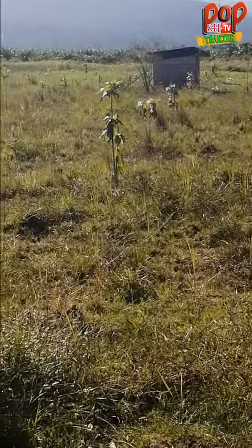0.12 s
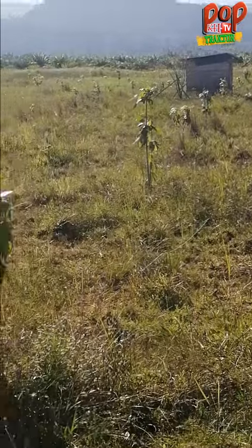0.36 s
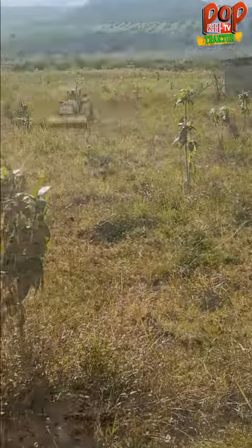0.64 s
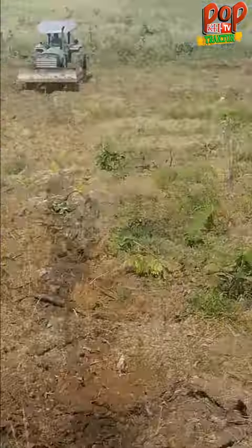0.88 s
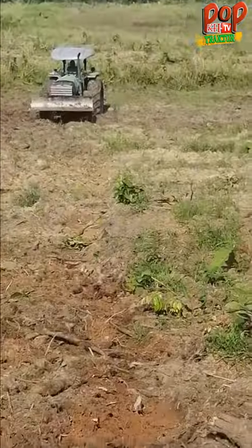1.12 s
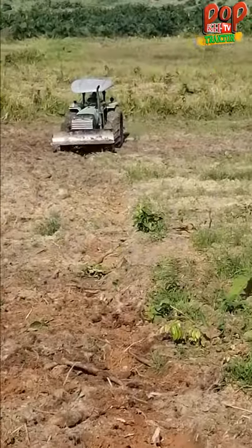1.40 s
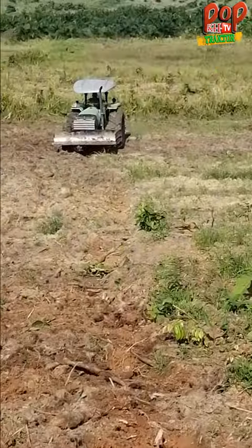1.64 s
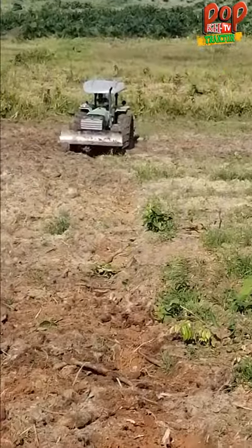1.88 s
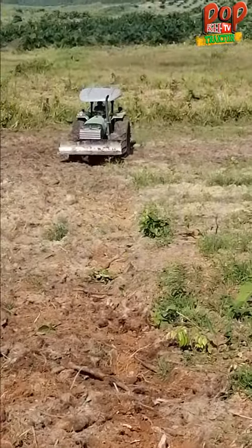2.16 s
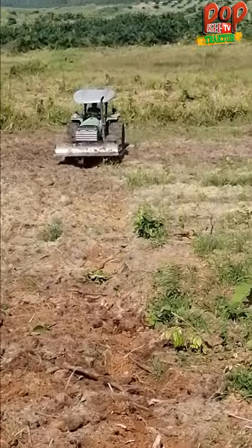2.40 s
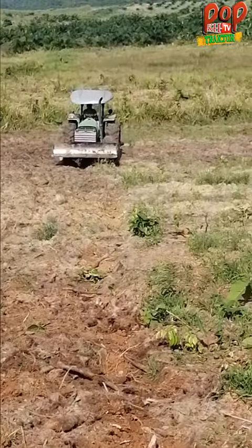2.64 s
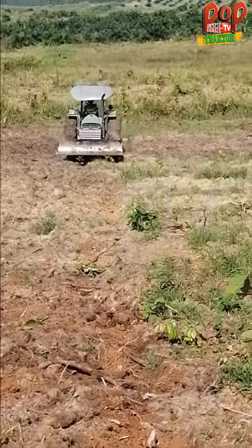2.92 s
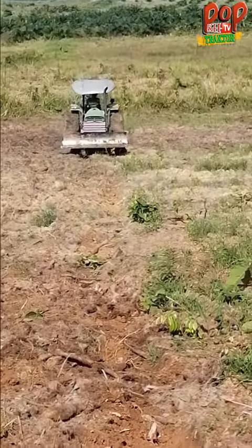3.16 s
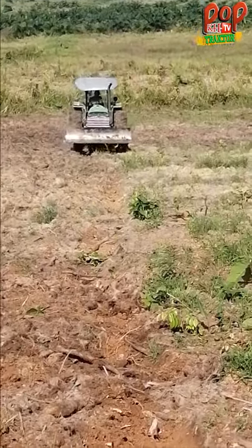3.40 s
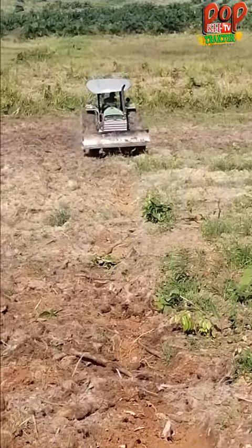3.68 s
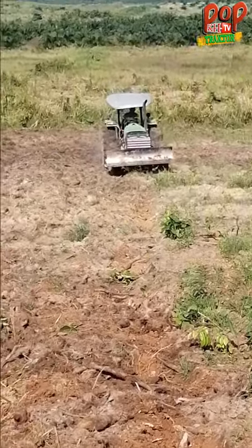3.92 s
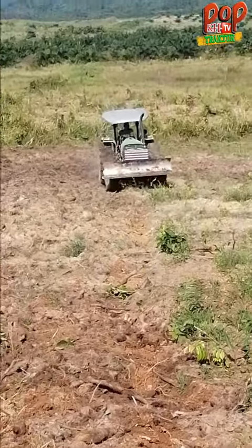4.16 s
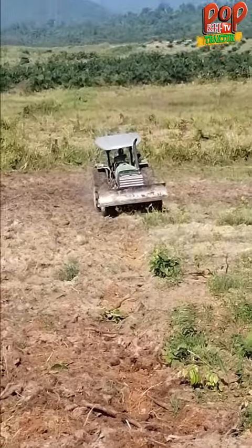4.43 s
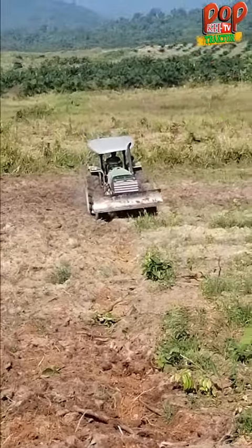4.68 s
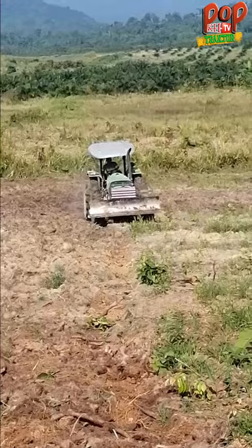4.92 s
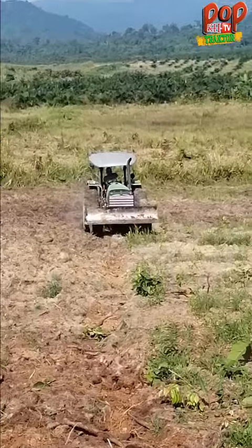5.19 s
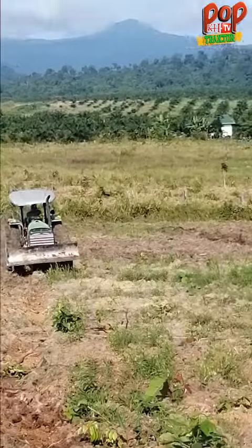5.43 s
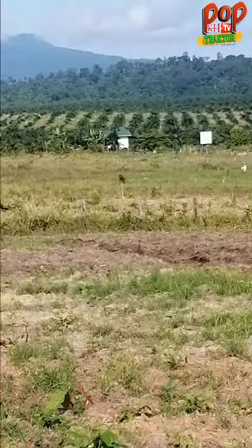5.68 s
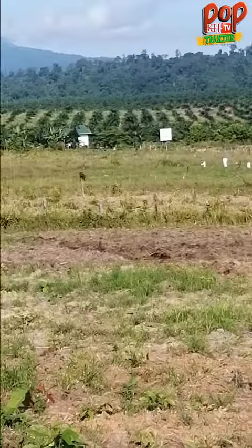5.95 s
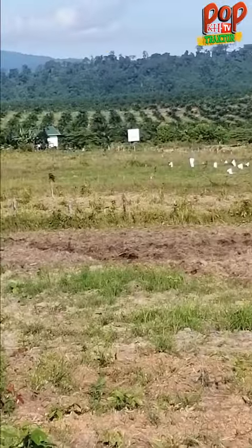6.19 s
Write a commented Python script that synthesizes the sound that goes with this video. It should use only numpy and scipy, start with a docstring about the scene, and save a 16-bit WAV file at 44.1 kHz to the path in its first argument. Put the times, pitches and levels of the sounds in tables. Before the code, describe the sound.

A still, open field opens with soft low wind on the microphone, faint dry grass crackle and a few tiny stalk snaps. Just before one second it cuts hard to a labouring diesel tractor: low drone, fast clattering knock and metallic clanks. The engine pitch wavers up and down, briefly sinking as the fuel eases and biting back, with rumble slowly growing. Stereo outdoor handheld pickup, dry, no echo.

```python
"""Wind buffets two microphone ports, dry grass crackles underfoot and an engine swells far off; then a hard
cut to a four-cylinder diesel tractor labouring across a field. Wind, grass and far engine are coloured noise.
The tractor is exhaust harmonics plus knock noise gated by each firing and rung through block and bonnet
resonances; its speed follows a table, and scheduled governor fuel cuts sink knock and exhaust.
The two ports differ in colour."""
import sys
import numpy as np
from scipy import signal
from scipy.fft import rfft, irfft, next_fast_len
from scipy.io import wavfile
from scipy.ndimage import uniform_filter1d, map_coordinates

SR = 44100
rng = np.random.default_rng(int(sys.argv[2]) if len(sys.argv) > 2 else 0)


def bounce(signal):
    """Save signal as a 16-bit WAV file at the path given by the first command-line argument."""
    frames = np.transpose(np.atleast_2d(signal))
    limited = np.clip(frames, -1, 1)
    pcm = np.round(limited * 32767).astype(np.int16)
    wavfile.write(sys.argv[1], SR, pcm)


def volts(x):
    """Linear amplitude factor 10**(x/20) for a level x in dB, scalar or array-like."""
    e = np.asarray(x, float) / 20
    return 10 ** e


N = 278712
ENGINE_START_S = 0.805  # hard cut from field to tractor


def unit(x):
    """Scaled to rms 1."""
    return x / np.sqrt(np.mean(x ** 2) + 1e-20)


def along(points, hz):
    """(Hz, value) points interpolated on a log frequency axis."""
    f, v = np.transpose(points)
    return np.interp(np.log(hz + 1), np.log(f + 1), v)


def curves(rows):
    """One value per sample for each column after the time in seconds."""
    s, *cols = np.transpose(rows)
    return [np.interp(np.arange(N) / SR, s, c) for c in cols]


def wobble(rate_hz):
    """A smooth random curve with rate_hz knots a second."""
    knots = rng.standard_normal(int(N * rate_hz / SR) + 4)
    return map_coordinates(knots, [np.arange(N) * rate_hz / SR])


def filtered(x, response):
    """x times a complex response of frequency."""
    m = next_fast_len(N + SR // 2, True)
    return irfft(rfft(x, m) * response(np.fft.rfftfreq(m, 1 / SR)), m)[..., :N]


def above(x, edge_hz):
    """The part above an edge."""
    return filtered(x, lambda hz: 1 / (1 + (edge_hz / (hz + 1)) ** 6))


def causal(gain):
    """The minimum-phase response with this gain, by folding the cepstrum."""
    cep = irfft(np.log(gain + 1e-6))
    half = cep.shape[-1] // 2
    cep[..., 1:half] *= 2
    cep[..., half + 1:] = 0
    return np.exp(rfft(cep))


def ports(noise, alike, gains):
    """Two noises mixed into a left-right pair of given likeness and gains."""
    def mix(hz):
        turn = np.arccos(np.clip(along(alike, hz), 0, 1)) / 2
        rotation = np.array([[np.cos(turn), np.sin(turn)], [np.cos(turn), -np.sin(turn)]])
        return rotation * gains(hz)[:, None]
    return filtered(noise, mix).sum(axis=1)


def patchy(noise, depth_db):
    """Random gain in patches of time and frequency, as if panels took turns."""
    z = signal.stft(noise, nperseg=256)[2]
    spots = rng.standard_normal(z.shape[-2:])
    spots = uniform_filter1d(uniform_filter1d(spots, size=3, axis=0), size=7, axis=1)
    return unit(signal.istft(z * volts(depth_db * unit(spots)), nperseg=256)[1][..., :N])


def bursts(times_s, sizes, t60_s, rise_s):
    """An envelope of blows, each rising fast and dying away."""
    t = np.arange(SR // 10) / SR
    blows = np.bincount(np.clip(times_s * SR, 0, N - 1).astype(int), sizes, N)
    return signal.fftconvolve(blows, volts(-60 * t / t60_s) * (1 - np.exp(-t / rise_s)))[:N]


def table_gain(points):
    """Equal gain at both ports from (Hz, dB) points."""
    return lambda hz: volts(along(points, hz)) * np.ones((2, 1))


def wind_buffet():
    """Wind turbulence at the ports: low-frequency noise, partly alike left and right."""
    # Each row: frequency in Hz, gain in dB.
    colour = [(15, -30), (25, 1), (118, 1), (132, -1.5), (188, -27), (257, -26), (300, -33), (390, -55),
              (660, -120)]
    return unit(ports(rng.standard_normal((2, N)), [(60, 0.61)], table_gain(colour)))


def grass_rustle(treble_db):
    """Dry grass: noise with fast random crackle, nearly unrelated at the two ports."""
    # Each row: frequency in Hz, gain in dB.
    colour = [(200, -4), (400, -2), (700, -5.5), (2300, -5), (3500, -10), (5800, -7.5), (7000, -11),
              (11000, -9.5), (15000, -16.5)]
    crackle = 1 + 0.3 * volts(3.4 * wobble(149.2))
    noise = crackle * patchy(rng.standard_normal((2, N)), depth_db=2.5)
    grass = unit(ports(noise, [(300, 0.44), (3000, 0)], table_gain(colour)))
    return grass + (volts(treble_db - 2) - 1) * above(grass, 7900)


def far_engine():
    """Distant engine: wavering noise in bands at 450 and 1100 Hz, swelling along a table."""
    # Each row: time in seconds, level in dB.
    swell = [(.55, -80), (.6, -74), (.8, -73)]

    def colour(hz):
        bands = 1 / (1 + ((hz - 1100) / 110) ** 4) + 0.71 / (1 + ((hz - 450) / 30) ** 4)
        return [bands] * np.ones((2, 1))
    noise = volts(2.1 * wobble(28.8)) * rng.standard_normal((2, N))
    return volts(curves(swell)[0]) * unit(ports(noise, [(1000, 0.83)], colour))


def add_swish(air):
    """A blade of grass swishes: a wavering tone gliding upward under a short hump."""
    t = np.arange(SR // 8) / SR
    hz = 1050 + 9000 * t + 250 * wobble(304)[:len(t)]
    level_db = -61 - ((t - .06) / 0.017) ** 2 + 2.9 * wobble(117)[:len(t)]
    swish = volts(level_db) * np.sin(2 * np.pi * np.cumsum(hz) / SR)
    air[:, :len(t)] += swish * volts([[3], [-3]])


def add_snaps(air):
    """Stalks snap: a sine plus noise, dying 60 dB in 12 cycles."""
    # Each row: start in seconds, level in dB before trim, frequency in Hz, left minus right in dB.
    snaps = [(0.0603, -41, 1610, 17), (0.0802, -39, 2080, 22), (0.09, -49, 1680, 1.0),
             (0.3792, -40, 4550, 3), (0.4024, -55, 2110, -0.5)]
    trim_db = -6.5
    t = np.arange(SR // 50) / SR
    for s, db, hz, pan_db in snaps:
        ring = 1.4 * np.sin(2 * np.pi * hz * t) + .5 * rng.standard_normal(len(t))
        snap = volts(db + trim_db - 60 * t * hz / 12) * ring
        air[:, round(s * SR):][:, :len(t)] += snap * volts([[pan_db / 2], [-pan_db / 2]])


def field():
    """Wind, grass, stalks and the far engine, silenced when the tractor enters."""
    # Each row: time in seconds, buffet level, grass level and grass treble in dB, all before trims.
    levels = [(0.0, -54, -64, 0.5), (0.42, -54, -66.5, 1), (0.53, -54, -70, -5), (0.62, -60, -67, -7),
              (0.7, -54, -67.5, -10), (0.78, -56, -65.5, -12)]
    buffet_db, grass_db, treble_db = curves(levels)
    air = volts(buffet_db + 0.5) * wind_buffet() + volts(grass_db + 6.5) * grass_rustle(treble_db) + far_engine()
    add_swish(air)
    add_snaps(air)
    return air * (np.arange(N) < ENGINE_START_S * SR)


def governor():
    """Exhaust, knock and brightness in dB: the load, less what each scheduled fuel cut takes away."""
    # Each row: time in seconds, exhaust second harmonic in dB, combustion knock in dB,
    # treble over the knock in dB; all before later trims.
    load = [(.81, -35, -36.5, -10), (1.2, -36, -39.5, -7), (1.55, -37, -38.5, -9.5), (2.0, -34, -35.5, -8),
            (2.4, -33, -35, -8), (2.7, -32, -36, -6), (2.88, -33, -35, -8), (3.5, -32.5, -34.5, -9),
            (4.25, -33, -34, -8.5), (4.6, -33.5, -37.5, -7.5), (5.05, -32.5, -36.5, -8),
            (5.28, -33, -36.5, -6), (5.44, -32.5, -34, -7.5), (5.7, -33, -35, -7), (6.32, -34, -35.5, -10)]
    # Each row: start in seconds, length in seconds, loss of knock in dB, hollow in the second harmonic in dB.
    fuel_cuts = [(2.101, .19, 11, 16), (2.879, 0.28, 9, 12), (3.635, 0.46, 5.5, -0.5), (5.05, 0.17, 7, 1),
                 (5.883, 0.2, 4, 1)]
    cut_off_s, pick_up_s = 0.031, 0.034  # fuel leaves, fuel returns
    sudden_share, sink_s = 0.68, 0.11  # part of a loss at once; the rest sinks in over this time
    exhaust_share = 0.55  # of the knock's loss
    hollow_at, hollow_width = 0.64, 0.25  # in cut lengths
    bite_db, bite_s = 2, 0.037  # extra treble as fuel returns
    clatter_at_s, clatter_s, clatter_db, clatter_bright_db = 5.478, 0.018, 3, 3.5  # one bright burst
    second_db, knock_db, bright_db = curves(load)
    t = np.arange(N) / SR
    ramp = lambda s, over_s: np.clip(s / over_s, 0, 1)
    bump = lambda s, width_s: np.exp(-(s / width_s) ** 2)
    for s, length, loss_db, hollow_db in fuel_cuts:
        off = sudden_share * ramp(t - s, cut_off_s) + (1 - sudden_share) * ramp(t - s, sink_s)
        off *= ramp(s + length + pick_up_s / 2 - t, pick_up_s)
        hollow = bump(t - s - hollow_at * length, hollow_width * length)
        knock_db = knock_db - loss_db * off
        second_db = second_db - exhaust_share * loss_db * off - hollow_db * hollow
        bright_db = bright_db + bite_db * bump(t - s - length, bite_s)
    clatter = bump(t - clatter_at_s, clatter_s)
    return second_db, knock_db + clatter_db * clatter, bright_db + clatter_bright_db * clatter


def body(hz):
    """Block and bonnet: steep resonances, causal, with a phase lead between the ports."""
    # Each row: resonance in Hz, width in Hz, left gain in dB, right gain in dB.
    resonances = [(124, 97, -8.5, -1.5), (255.6, 32, -11, -10), (342, 117, -10, -9),
                  (455.7, 63, -10.5, -7.5), (662.6, 95, -6, -41), (785, 112, -6.5, -1.5),
                  (924, 89, -4.5, 3), (1051, 302, -10.5, 0), (1208, 156, -10, 1.5), (1355, 27, -6.5, -3),
                  (1907, 505, -14, -13), (2110, 190, -23, -14), (2430, 510, -17.5, -14),
                  (2771, 390, -17.5, -10.5), (3710, 1160, -23, -37), (5130, 2030, -29, -21),
                  (6520, 310, -25.5, -24), (7600, 860, -36, -35.5), (8980, 1040, -38.5, -38.5),
                  (10400, 2400, -45, -37.5), (13400, 5600, -45, -40.5)]
    # Each row: frequency in Hz, lead of the left port in radians.
    left_lead = [(100, 0), (780, -.5), (1380, 1.1), (2070, -.2), (2670, .6), (3700, 3.3), (4130, 5.6),
                 (4820, 5.9), (6300, 8), (8010, 19)]
    power = sum(volts(2 * np.array([[l_db], [r_db]])) / (1 + (2 * (hz - c) / w) ** 2) ** 2
                for c, w, l_db, r_db in resonances)
    gain = np.sqrt(power)
    shared = causal(np.sqrt(gain[0] * gain[1]))
    lead = np.exp(.5j * np.outer([1, -1], along(left_lead, hz)))
    return gain * shared / np.abs(shared) * lead


def clanks():
    """Hard knocks: a short noise blow through the whole body, one panel ringing loudest."""
    # Each row: start in seconds, nominal peak in dB, frequency of the ringing panel in Hz.
    hits = [(1.224, -22.5, 1190), (1.28, -25.5, 890), (1.922, -21.5, 940), (2.182, -28, 903),
            (2.314, -29, 890), (2.339, -26, 920), (2.481, -24.5, 773), (2.559, -25, 1150),
            (2.635, -23.5, 927), (2.807, -26, 2150), (3.123, -31, 850), (3.169, -20.5, 910),
            (3.192, -25, 1116), (3.25, -37, 914), (3.616, -21, 964), (3.715, -33, 1090), (4.201, -28, 996),
            (4.256, -22, 920), (4.2752, -25.5, 2110), (4.48, -30, 950), (5.464, -22.5, 930),
            (5.4725, -25.5, 1970), (5.5608, -28.5, 2110), (5.619, -25, 775), (5.723, -19, 1010),
            (5.7992, -25, 2160), (5.842, -20.5, 970), (6.067, -27.5, 930)]
    t = np.arange(SR // 20) / SR
    blows, rings = np.zeros(N + SR), np.zeros((2, N + SR))
    grid_hz = np.linspace(0, SR / 2, 2049)
    colour = np.abs(body(grid_hz))
    for s, db, hz in hits:
        shape = volts(db - 60 * t / 0.038) * (1 - np.exp(-t / 0.00064))
        sides = colour[:, np.searchsorted(grid_hz, hz), None]
        blows[round(s * SR):][:len(t)] += shape * rng.standard_normal(len(t))
        drift = np.cumsum(rng.normal(0, 0.035, len(t)))  # rad
        ring = np.sin(2 * np.pi * hz * t + drift)
        rings[:, round(s * SR):][:, :len(t)] += shape * sides / sides.mean() * ring
    blows = ports(blows[:N] * [[1], [0]], [(1000, 1)], body) / np.sqrt(np.mean(colour ** 2))
    return volts(-10) * blows + rings[:, :N]


def knock(firings, knock_db, bright_db):
    """Each firing strikes the block; valve gear rattles at random times, over a steady roar."""
    # Strength of each cylinder's knock in dB.
    cylinders = [-4, -2.5, -5.7, -6.5]
    # Each row: frequency in Hz, left-right likeness from 0 to 1.
    likeness = [(150, .995), (500, 0.99), (1000, 0.97), (2000, 0.88), (4000, .72), (8000, 0.3)]
    count = int(firings[-1])
    start = round(ENGINE_START_S * SR)
    at_s = np.interp(np.arange(count), firings[start:], np.arange(start, N) / SR)
    chance = rng.standard_normal((count, 3))
    at_s += .0007 * chance[:, 0]
    cylinder_db = np.resize(cylinders, count)

    ticks = rng.random((500, 2))
    tick_sizes = volts(-24.5 - 0.92 * np.log(ticks[:, 1]))
    rattle = bursts(ticks[:, 0] * N / SR, tick_sizes, t60_s=0.064, rise_s=0.0024)
    thud = rattle + bursts(at_s, volts(.5 * cylinder_db + 0.84 * chance[:, 1]), t60_s=0.055, rise_s=0.0024)
    # the sharper diesel knock
    crack = rattle + bursts(at_s, volts(cylinder_db + 2 * chance[:, 2]), t60_s=.034, rise_s=.002)

    noise = patchy(rng.standard_normal((2, N)), depth_db=1.55)
    roar = .17 * volts(-.7 * (knock_db + 36))  # off load the strokes sink into the roar
    hush = roar * volts(-.8 * (bright_db + 9))  # bright strokes stand clearer of the roar

    def band(gate, lo_hz, hi_hz):
        return above(gate * noise, lo_hz) - above(gate * noise, hi_hz)

    def over(blows, floor):
        power = np.mean(blows ** 2) + 2 * floor * np.mean(blows) + floor ** 2
        return (blows + floor) / np.sqrt(power)

    # tyres and plough draw nearer
    rumble_db = -36 + 0.51 * (knock_db + 39) + 1.27 * (np.arange(N) / SR - 3.5)
    source = volts(rumble_db) * band(over(thud, 1.0), 30, 475)
    source += volts(knock_db) * band(over(thud, roar), 470, 1637)
    # fan and intake fill the gaps at the top of the band, hence its higher floor
    treble = band(over(crack, .7 * hush), 1500, 3300) + band(over(crack, 1.8 * hush), 3300, 20000)
    source += volts(knock_db + bright_db + 8.5) * treble
    return volts(0.85) * ports(source, likeness, body) / np.std(ports(noise, likeness, body))


def exhaust(firings, speed_hz, second_db, knock_db):
    """Clean harmonics of the firing rate; the third swells near the silencer's resonance."""
    # Each row: multiple of the firing rate, level in dB before the approach.
    overtones = [(5, -66.5), (6, -63)]
    turn = 2 * np.pi * (firings + 0.416)
    nearer_db = np.arange(N) / SR - 3.5  # the upper harmonics grow as the tractor approaches
    first_db = -38 + 0.12 * (knock_db + 34.5) + 0.22 * (speed_hz - 51) + 0.59 * wobble(22.9)
    silencer_db = -20 * np.log10(1 + ((3 * speed_hz - 140) / 9) ** 2) / 2
    third_db = -44 + nearer_db + silencer_db + 3 * wobble(10)
    tone = volts(first_db) * np.cos(turn)
    tone += volts(second_db + .6 * wobble(30)) * np.cos(2 * turn + 1.9 + .13 * wobble(16))
    tone += volts(third_db) * np.cos(3 * turn + 3.1 + 0.22 * wobble(7.2))
    for k, db in overtones:
        tone += volts(db + nearer_db + 4.4 * wobble(8)) * np.cos(k * turn + 0.8 * wobble(10))
    return np.sqrt(2) * tone * volts([[-2.2], [1.8]])


def tractor():
    """Drone and knock share the crankshaft: one firing count drives both; clanks are added."""
    # Each row: time in seconds, firings per second.
    speed = [(0.805, 49.66), (1.17, 51.98), (1.62, 47.48), (2.12, 55.71), (2.27, 42.81), (2.48, 51.05),
             (2.78, 52.96), (2.92, 57.39), (3.14, 46.32), (3.34, 54.99), (3.65, 57.77), (3.76, 48.31),
             (4.12, 47.18), (4.32, 54.13), (4.73, 51.2), (5.03, 58.33), (5.22, 47.11), (5.43, 54.32),
             (5.71, 48.85), (5.82, 53.41), (6.02, 45.38), (6.32, 52.58)]
    speed_hz, = curves(speed)
    running = np.arange(N) >= ENGINE_START_S * SR
    firings = np.cumsum(speed_hz * running) / SR
    second_db, knock_db, bright_db = governor()
    drone = exhaust(firings, speed_hz, second_db, knock_db)
    return running * (drone + knock(firings, knock_db, bright_db) + clanks())


def scene():
    """The quiet field, then the tractor."""
    return field() + tractor()


def low_pass(x):
    """Removes everything above the highest recorded frequency."""
    return signal.sosfilt(signal.butter(12, 15990, fs=SR, output="sos"), x)


def record(dry):
    """The finished mix, as delivered."""
    return low_pass(dry)


dry = scene()
out = record(dry)
bounce(out)
```